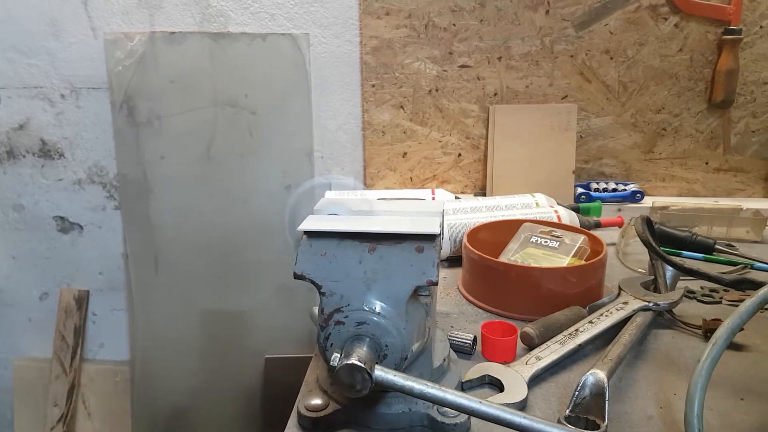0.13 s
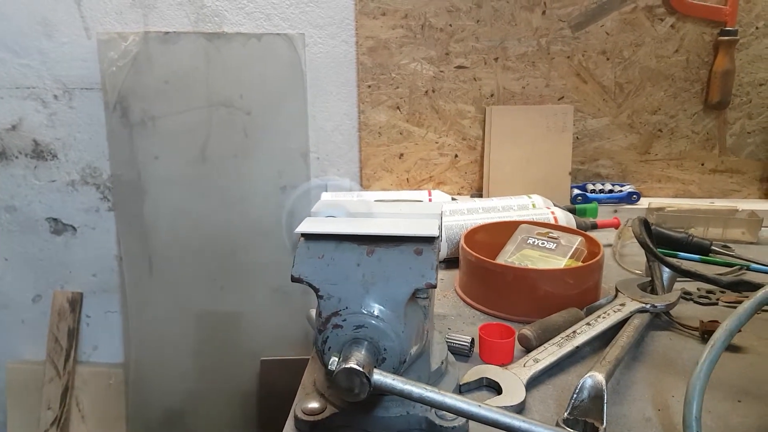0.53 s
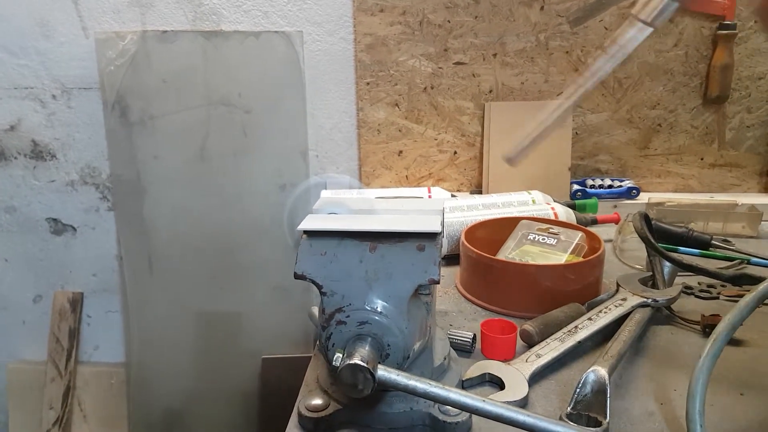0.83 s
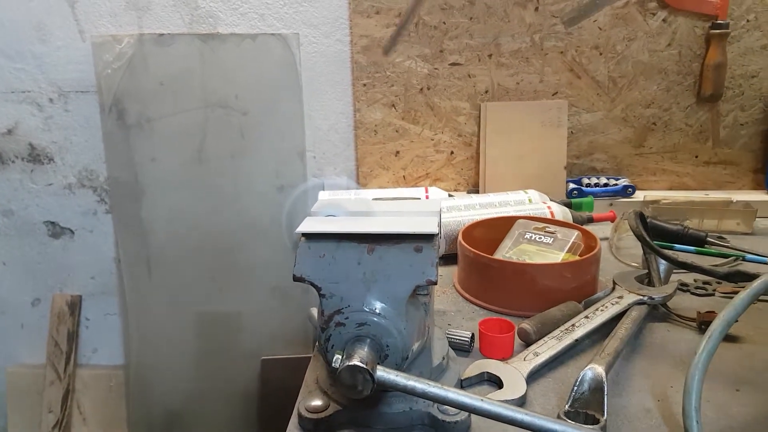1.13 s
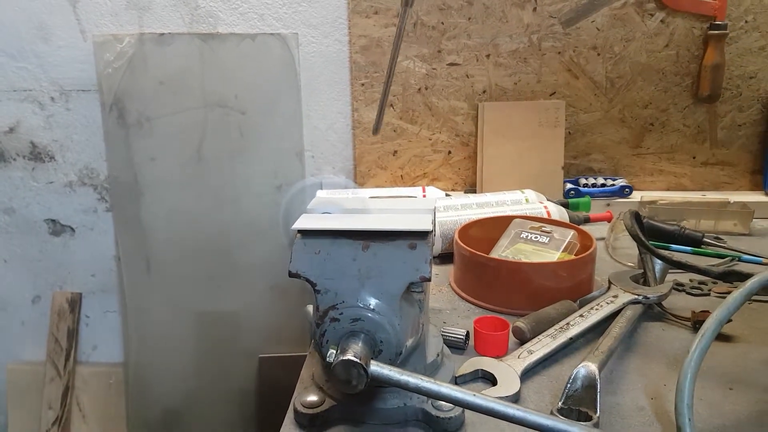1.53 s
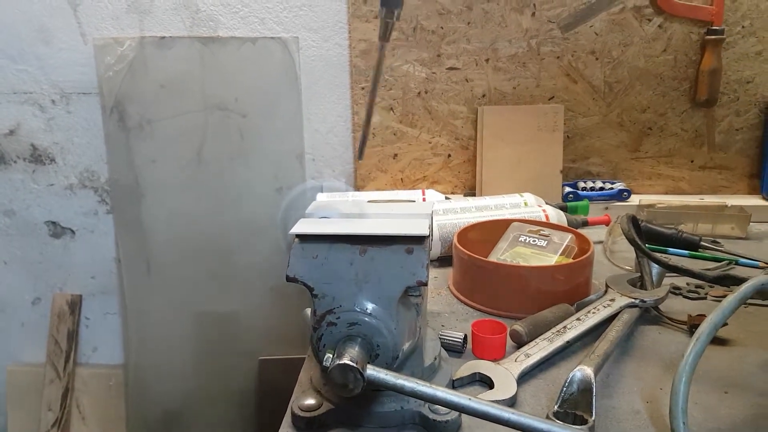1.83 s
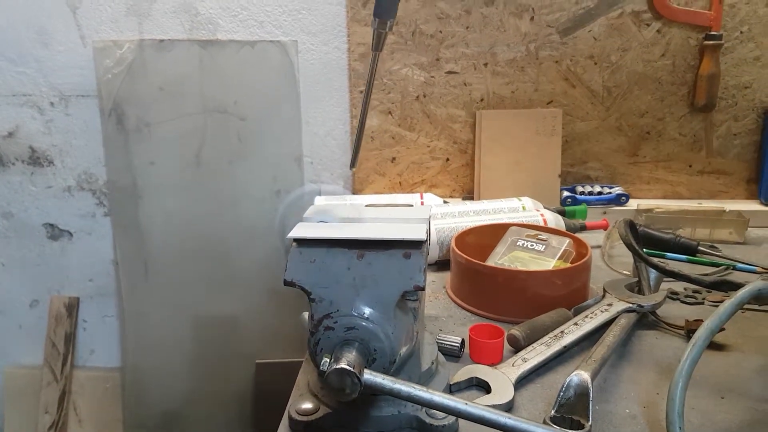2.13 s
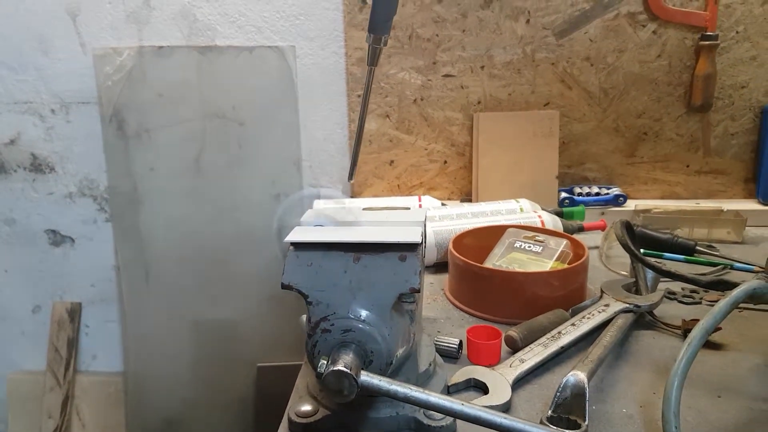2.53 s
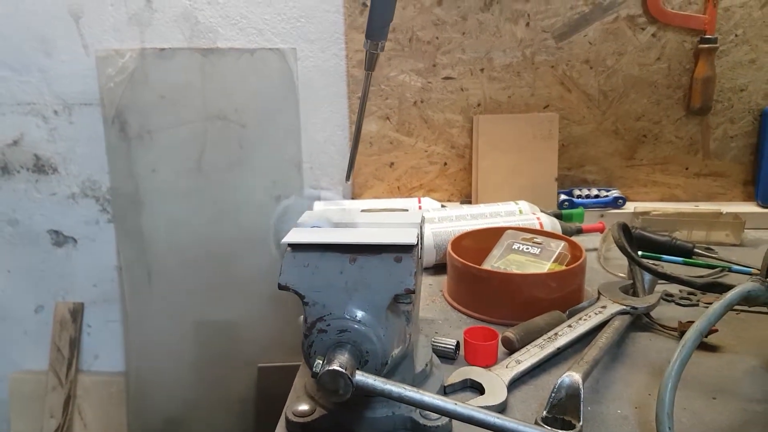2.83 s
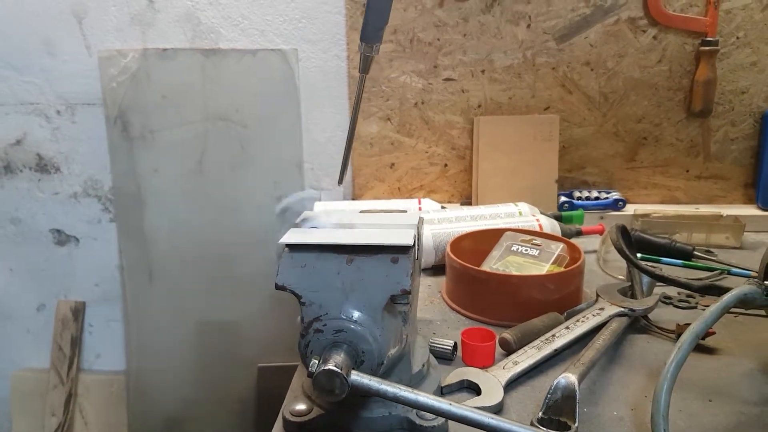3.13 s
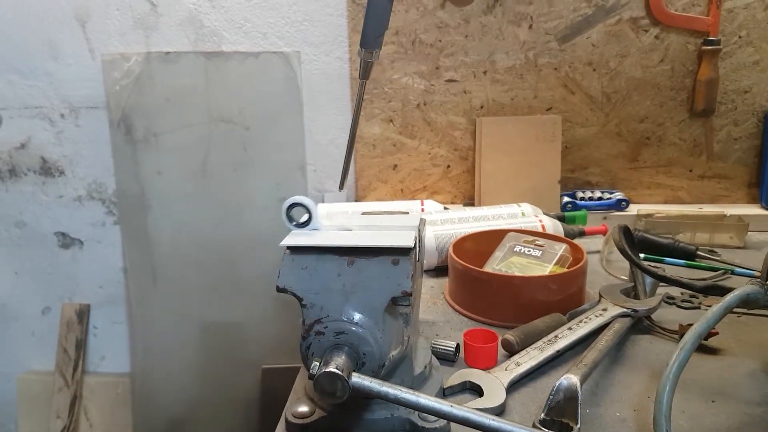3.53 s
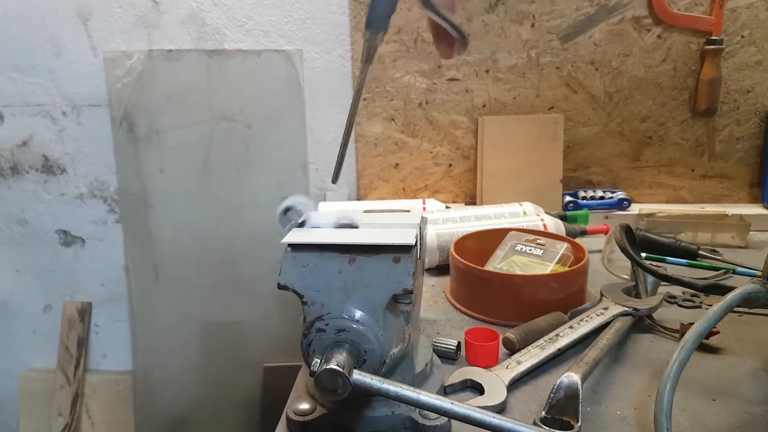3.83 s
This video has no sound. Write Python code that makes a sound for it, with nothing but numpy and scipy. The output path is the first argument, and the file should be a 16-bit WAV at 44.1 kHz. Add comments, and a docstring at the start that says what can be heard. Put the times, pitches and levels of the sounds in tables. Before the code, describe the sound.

Quiet humming workshop with handling knocks and hose scrapes, then a sudden close blast of bright compressed air, fluttering as a spinner slows, holding steady and cutting off with a click; left-weighted stereo, small room.

```python
"""In a small workshop an air gun blows for two seconds beside a coasting spinner on a workbench.
Before it come a low hum, thumps of handling, and the ticks and rustle of the hose: sines and shaped noise.
The valve opens with a puff of stored pressure; the jet, coloured turbulent noise, sags and swells as it is
aimed and is chopped by the slowing spinner, which whirrs in harmonics.
The valve then shuts to a brief leak, leaving the room's short diffuse tail."""
import sys
import numpy as np
from scipy import signal
from scipy.fft import rfft, irfft
from scipy.io import wavfile

SR = 44100
rng = np.random.default_rng(int(sys.argv[2]) if len(sys.argv) > 2 else 0)


def wav_out(sig):
    """Save sig, one row per channel (or a flat mono array), as 16-bit PCM at SR to the path in sys.argv[1]."""
    wavfile.write(sys.argv[1], SR, np.round(np.clip(np.atleast_2d(sig).T, -1, 1) * 32767).astype(np.int16))


N = 176400
T = np.arange(N) / SR  # seconds
HZ = np.maximum(np.fft.rfftfreq(N, 1 / SR), 1)  # every frequency of the spectrum

VALVE_OPEN_S = 1.879
FLUTTER_HZ = 33.97  # corner of the flicker in turbulent noise

# the spinner coasts almost to a stop, then picks up a little; whirr level and chop depth are relative:
# time_s, passes_per_s, whirr_db, chop_db
SPINNER_MOTION = [(1.88, 132.76, -50.5, 0.6579), (2.0, 120.82, -40, 1.2183), (2.1, 116.53, -41.5, 1.11),
                  (2.23, 104.67, -45.5, 1.6782), (2.38, 90.67, -46, 2), (2.6, 62.52, -47.5, 2),
                  (2.75, 48.08, -60.5, 2), (3.0, 38, -69.5, 1.5), (3.15, 35.82, -68, 1.5),
                  (3.35, 20.14, -69, 2), (3.55, 8.599, -80, 1), (3.65, 14.5, -80, 1.04),
                  (3.8, 34, -74.5, -0.813)]


def from_db(db):
    """A level in decibels is twenty times the logarithm of the amplitude ratio returned here."""
    return 10 ** (np.asarray(db) / 20)


def in_time(rows):
    """Linear interpolation carries each column of a time curve to every sample."""
    s, *columns = np.transpose(rows)
    return np.array([np.interp(T, s, c) for c in columns])


def in_hz(rows):
    """Interpolation over log frequency carries each column of a spectrum to every frequency."""
    hz, *columns = np.transpose(rows)
    return np.array([np.interp(np.log(HZ), np.log(hz), c) for c in columns])


def drift(corner_hz):
    """Low-passed white noise, scaled to unit standard deviation, is a slow random fluctuation."""
    slow = irfft(rfft(rng.standard_normal(N)) / (1 + (HZ / corner_hz) ** 2), N)
    return slow / slow.std()


def noise(colour, patchy_db=0, shelf_db=0):
    """Partly coherent stereo noise takes a spectral density; its bands may fluctuate independently."""
    # coherence of the two channels: frequency_hz, correlation
    likeness = [(50, 0.3127), (200, 0.6347), (550, 0.858), (1400, 0.32), (3000, 0.4803), (5000, 0.1946),
                (7000, 0.287), (12000, 0.4134), (15000, 0.1474)]
    # phase by which the left channel leads: frequency_hz, lead_radians
    lead = [(30, 0), (300, .5), (1120, 1.0), (1890, 6), (3400, 6.0), (4500, 5), (5500, 2.5), (8500, 2.5),
            (10500, 0.9192), (13100, 1.5), (15400, 3.5)]
    mid, side = rfft(rng.standard_normal((2, N)))
    alike = np.clip(in_hz(likeness)[0], -1, 1)
    both = np.sqrt(1 + alike) * mid + np.sqrt(1 - alike) * side * [[1], [-1]]
    both = both * from_db(in_hz(colour) + shelf_db) * np.sqrt(SR) / 2
    both = both * np.exp(1j * in_hz(lead) * [[0], [-1]])
    if not patchy_db:
        return irfft(both, N)
    centres = np.log(np.geomspace(400, 13000, 6))  # overlapping bands that sum to the whole
    total = 0
    for band in np.eye(6):
        part = irfft(both * np.interp(np.log(HZ), centres, band), N)
        total = total + part * from_db(patchy_db * drift(FLUTTER_HZ))
    return total


def dying(start_s, t60_s):
    """Exponential decay, begun by a jump to 1, falls 60 dB in each reverberation time."""
    return (T >= start_s) * from_db(-60 * np.clip((T - start_s) / t60_s, 0, 4))


def bell(centre_s, length_s):
    """A Gaussian envelope rises and falls smoothly about its centre."""
    return np.exp(-((T - centre_s) / length_s) ** 2)


def background():
    """Steady sources superpose: broadband room noise and a two-tone hum wavering in phase and level."""
    # spectral density, relative: frequency_hz, left_db_per_hz, right_db_per_hz
    room_tone = [(25.02, -101, -72.5), (62.97, -79, -67), (130.38, -80.5, -70.5), (235.8, -73.5, -81.5),
                 (356.9, -81.0, -95), (515.47, -80.5, -89), (844.16, -91.5, -99.6), (1095.2, -86, -97),
                 (1257.6, -77, -98.5), (1894.4, -96.5, -98.0), (3348, -97.5, -104.9), (3737, -88.5, -106.1),
                 (4798.2, -86.5, -109.0), (5185.2, -99.8, -112.0), (6494, -104.4, -114.8),
                 (8517, -115.5, -118.0), (11633, -108.7, -111.4), (15500, -110.9, -112.9)]
    # level of the room noise, relative: time_s, level_db
    room_level = [(0, 0.5), (.6, -1), (1.4, .5), (1.7, -2.5), (1.85, 1.5), (2.1, -7.5), (3.8, -4.5),
                  (3.95, -4)]
    # hum tones, right channel relative to left: pitch_hz, right_db
    hum_tones = [(172.0, -4.5), (301.5, -7)]
    # swelling and fading of the hum: time_s, low_tone_db, high_tone_db
    hum_level = [(0, -41.5, -59.5), (.32, -46, -57.5), (.5, -58, -56.5), (.75, -51.5, -57.5),
                 (.95, -48.5, -64), (1.08, -39.5, -72), (1.25, -46.5, -56.5), (1.5, -53.5, -56.5),
                 (1.72, -60, -54), (4, -57.5, -61.5)]
    hum = 0
    for (hz, right_db), level_db in zip(hum_tones, in_time(hum_level)):
        tone = np.sin(2 * np.pi * hz * T + .5 * drift(8.34))
        hum = hum + from_db([[0], [right_db]]) * tone * from_db(level_db + 2 * drift(8.8))
    return noise(room_tone, patchy_db=1.7912) * from_db(in_time(room_level)) + hum


def thumps():
    """Structure-borne impulses: each soft knock is a low cosine under a short Gaussian envelope."""
    # handling, valve and gusts: centre_s, pitch_hz, length_s, left_db, right_db
    knocks = [(.033, 102.9, 0.005301, -50, -17), (.034, 225.2, 0.001913, -41, -26),
              (0.088, 98.4, 0.00776, -48, -17.5), (0.128, 50, 0.01122, -51.5, -30),
              (0.179, 85, 0.003445, -58, -28), (0.216, 75, 0.00651, -52, -26),
              (0.275, 60, .008, -59, -39.5), (0.454, 74.87, 0.005286, -55.5, -28),
              (0.941, 59.96, 0.01217, -55, -38), (1.754, 64.96, 0.00929, -59, -35.5),
              (1.798, 80.06, 0.01132, -52, -34.5), (1.892, 84.78, 0.012895, -24.5, -42),
              (3.149, 111, 0.0078, -38.5, -40), (3.394, 94.78, 0.0098, -36, -40),
              (3.869, 181, 0.007028, -25, -33), (3.898, 163.7, 0.0173, -33, -40.5),
              (3.937, 69.6, 0.0115, -47.5, -39)]
    total = 0
    for s, hz, length_s, left_db, right_db in knocks:
        knock = -np.cos(2 * np.pi * hz * (T - s)) * bell(s, length_s)
        total = total + from_db([[left_db], [right_db]]) * knock
    return total


def ticks():
    """Impact excites a scratchy band of noise and a faint ringing mode, both dying exponentially."""
    # small metal ticks of the gun and its coupling, left levels: start_s, crack_db, ring_hz, ring_db
    taps = [(0.3954, -39.5, 4560, -45), (.679, -45, 4110, -57), (1.1673, -31, 4142, -50),
            (1.3031, -38.5, 6617, -51.5), (1.4485, -50, 4600, -56.5), (3.932, -27, 6247, -30)]
    crack_hz, crack_t60_s, ring_t60_s = 4426, 0.02564, .075
    edges_hz = [crack_hz / 1.3138, crack_hz * 1.1565]
    band = signal.butter(2, edges_hz, "band", fs=SR, output="sos")
    crack = signal.sosfilt(band, rng.standard_normal(N))
    crack /= crack.std()
    total = 0
    for s, crack_db, ring_hz, ring_db in taps:
        scratch = from_db(crack_db) * crack * dying(s, crack_t60_s)
        ring = from_db(ring_db) * np.sin(2 * np.pi * ring_hz * (T - s)) * dying(s, ring_t60_s)
        total = total + np.clip((T - s) / 0.00176, 0, 1) * (scratch + ring)  # onset ramp in s
    return total * from_db([[0], [-19]])  # left, right


def hose():
    """Sliding friction makes grainy noise, swelling with each stroke of the hose over the bench."""
    # strokes, relative level: centre_s, length_s, level_db
    slides = [(0.76, 0.01344, -6), (0.926, 0.0095, -2.5), (0.958, 0.01079, -6.5), (1.018, 0.01183, -7),
              (1.036, 0.010835, 1), (1.075, 0.03606, 1), (1.154, 0.01181, 1.5), (1.172, 0.003746, 12),
              (1.192, 0.02176, 0.5), (1.318, 0.0309, -11), (1.468, 0.01463, -12)]
    # spectral density, relative: frequency_hz, left_db_per_hz, right_db_per_hz
    slide_colour = [(199.5, -77, -88), (684.2, -80, -91), (1257.6, -90.5, -111), (1713.7, -80, -94),
                    (2995, -89, -99), (4295, -83, -106), (5549, -93.5, -108), (6990, -97, -112),
                    (8978, -118, -122), (12000, -113, -117), (16000, -118, -122)]
    stroke = sum(from_db(db) * bell(s, length_s) for s, length_s, db in slides)
    return noise(slide_colour) * stroke * from_db(2.624 * drift(318.3))


def valve_opening():
    """A valve gates the flow: it snaps open, holds, falls quickly to a dwindling leak, then seats."""
    attack_s, shut_s, close_db_per_s = 0.004812, 3.856, 895.5
    # air still escapes until the valve seats
    leak_db, leak_db_per_s, seated_s, reseat_db_per_s = -11.5, 173, 3.935, 500
    since_s = np.maximum(T - shut_s, 0)
    escaping_db = leak_db - leak_db_per_s * since_s
    escaping_db = escaping_db - reseat_db_per_s * np.maximum(T - seated_s, 0)
    opening = np.clip((T - VALVE_OPEN_S) / attack_s, 0, 1)
    return opening * from_db(np.maximum(-close_db_per_s * since_s, escaping_db))


def puff():
    """Stored pressure discharges as a burst of coloured noise that decays exponentially."""
    # spectral density, relative: frequency_hz, left_db_per_hz, right_db_per_hz
    puff_colour = [(30, -54, -80.5), (79, -44.5, -72.5), (169.8, -51.5, -61.5), (300.3, -57, -70),
                   (623.3, -53.5, -90.5), (1200, -57.5, -90), (2443.6, -56.5, -75), (4498, -44, -71),
                   (6197, -46, -61.5), (8630, -59.5, -64), (12130, -50, -55.5), (15990, -61, -64.5)]
    decay_db_per_s = 205.5
    return noise(puff_colour) * from_db(-decay_db_per_s * np.maximum(T - VALVE_OPEN_S, 0))


def bench_lift():
    """Resonance of tools and surfaces around the jet lifts narrow bands, given in dB per frequency."""
    # resonances: centre_hz, width_hz, lift_db
    bench = [(1310.6, 42.8, 6.5), (1589.3, 84.8, 3), (2020.1, 45.12, 5), (2369, 79.3, 5),
             (3165.6, 85.9, 2.5), (3550.3, 48.7, 3.5), (3893.8, 40.27, 5), (4323.9, 145.2, 3.5),
             (4500.2, 61.63, 4), (4831.8, 47.1, 4.5), (5076.3, 34.9, 7), (5452.9, 53.46, 7),
             (6012.5, 31.9, 0), (6781.4, 43.4, 2)]
    return -0.978 + sum(db / (1 + (2 * (HZ - hz) / width) ** 2) for hz, width, db in bench)


def jet():
    """Turbulent mixing gives broadband hiss, coloured by bench resonances and driven by the aim."""
    # spectral density, relative: frequency_hz, left_db_per_hz, right_db_per_hz
    jet_colour = [(30, -82.5, -125), (89.2, -60, -84), (227.4, -66.5, -72), (324.06, -68, -87),
                  (418.82, -61.5, -70.5), (582.6, -69.5, -79.5), (883.03, -70.5, -74.5),
                  (999.05, -58.5, -79.5), (1153.9, -65, -79.5), (1390.4, -58.5, -82.5),
                  (1982.4, -58, -74.5), (2083.3, -64, -78), (2701.2, -62.5, -70), (3031, -57.5, -70.5),
                  (3580.2, -56.5, -74.5), (3884.5, -50.5, -72.5), (4598.5, -45.5, -70),
                  (4809.1, -44.5, -75.5), (5122, -55, -70), (5943.7, -55, -70), (7090.9, -57.5, -69.5),
                  (8091, -66.5, -89), (8903.4, -69, -75), (10430, -64.5, -70), (12271, -57.5, -67.5),
                  (13888, -68.5, -71), (15504, -68, -79)]
    # strength of the jet as it is aimed, relative: time_s, level_db
    flow = [(1.89, 5), (1.98, 2.5), (2.08, 0.0696), (2.3, -2.5), (2.5, -3.5), (2.64, -2), (2.78, 0.5292),
            (2.96, 0.2229), (3.08, 1.8262), (3.3, -0.6223), (3.44, -0.1122), (3.49, 1), (3.54, -0.5537),
            (3.63, 2.5), (3.72, 1.3688), (3.85, 2)]
    bass_db = -10 / (1 + (HZ / 485.44) ** 2)  # low shelf
    hiss = noise(jet_colour, patchy_db=.5, shelf_db=bench_lift() + bass_db)
    return hiss * from_db(-0.7885 + in_time(flow) + 0.445 * drift(FLUTTER_HZ))


def spin_angle():
    """Phase is the integral of rate: radians, one cycle for each pass through the jet."""
    return 2 * np.pi * np.cumsum(in_time(SPINNER_MOTION)[0]) / SR


def chopped(hiss):
    """Amplitude modulation: the spinner's passes raise and lower the hiss, most of all its treble."""
    overtone, mid_share, split_hz = 0.5331, 0.5989, 6281
    angle, depth_db = spin_angle(), in_time(SPINNER_MOTION)[2]
    chop_db = depth_db * (np.cos(angle) + overtone * np.cos(2 * angle))
    mids = irfft(rfft(hiss) / (1 + (HZ / split_hz) ** 8), N)
    treble = hiss - mids
    return mids * from_db(mid_share * chop_db) + treble * from_db(chop_db)


def rush():
    """Flow past obstacles sheds low noise where the jet grazes the spinner and vice."""
    # strength, relative: time_s, level_db
    rush_level = [(1.9, 5), (2.03, -5), (2.22, 1.5), (2.45, -3.5), (2.6, 1.5), (2.69, 6.5), (2.8, -7),
                  (3.08, -8), (3.17, 2.5), (3.26, 1), (3.38, -2.5), (3.5, -3.5), (3.85, -7)]
    # spectral density, relative: frequency_hz, left_db_per_hz, right_db_per_hz
    rush_colour = [(40, -110.5, -100.5), (99.8, -80.5, -83), (204.3, -69.5, -75), (449.2, -70, -81),
                   (745.3, -72.5, -85), (2000, -106, -100)]
    return noise(rush_colour) * from_db(in_time(rush_level) + 3.77 * drift(37.6))


def spinner():
    """Periodic rotation whirrs in harmonics of the pass rate, unsteady in level."""
    # harmonics, relative level: multiple, level_db
    whirr_harmonics = [(1, -8), (2, -3.5), (3, -3)]
    angle, whirr_db = spin_angle(), in_time(SPINNER_MOTION)[1]
    whirr = 0
    for multiple, level_db in whirr_harmonics:
        waver_db = 2.5 * drift(2.765)
        whirr = whirr + np.sin(multiple * angle) * from_db(whirr_db + level_db + waver_db)
    return whirr * from_db([[3], [-5]])  # left, right


def air_gun():
    """Superposed jet, puff, rush and whirr are all gated by the one valve."""
    return valve_opening() * (chopped(jet()) + puff() + rush() + spinner())


def workshop(x):
    """Convolution with exponentially decaying noise adds a diffuse reverberant tail to direct sound."""
    t60_s, tail_db, wall_cut_hz = 0.2809, -12, 11647
    tail = rng.standard_normal((2, SR)) * dying(0.003, t60_s)[:SR]
    tail /= np.sqrt((tail ** 2).sum(1, keepdims=True))  # unit energy before the walls dull it
    tail = signal.sosfilt(signal.butter(2, wall_cut_hz, fs=SR, output="sos"), tail)
    return x + from_db(tail_db) * signal.fftconvolve(x, tail, axes=1)[:, :N]


def scene():
    """Superposition: gun, hose and ticks sound in the room, with thumps and background added dry."""
    return workshop(air_gun() + hose() + ticks()) + thumps() + background()


def record(dry):
    """Overload clips peaks beyond full scale, and a steep low-pass limits the bandwidth."""
    cutoff_hz = 15900
    return irfft(rfft(np.clip(dry, -1, 1)) / np.sqrt(1 + (HZ / cutoff_hz) ** 400), N)


dry = scene()
out = record(dry)
wav_out(out)
```